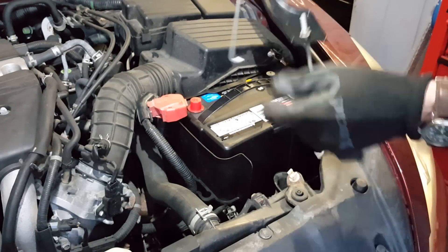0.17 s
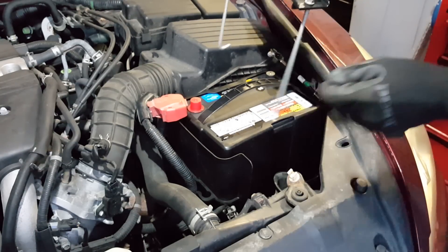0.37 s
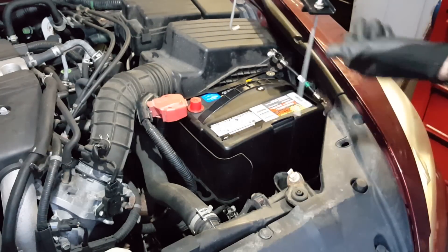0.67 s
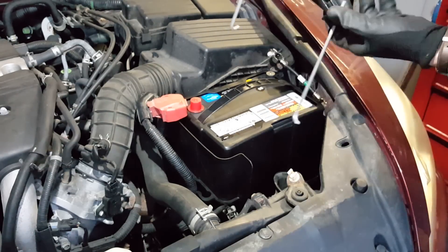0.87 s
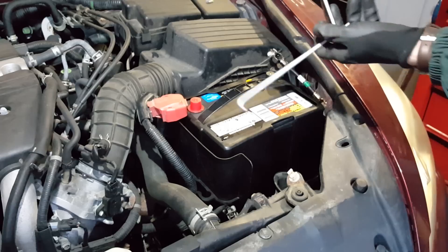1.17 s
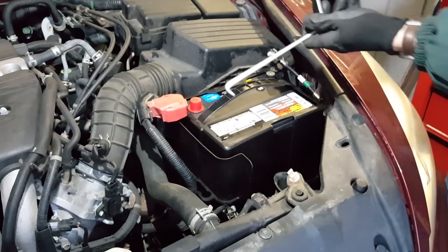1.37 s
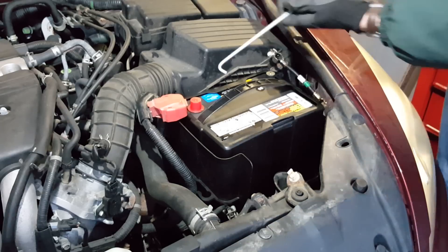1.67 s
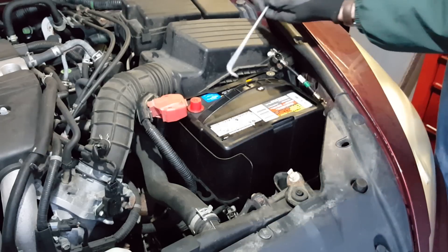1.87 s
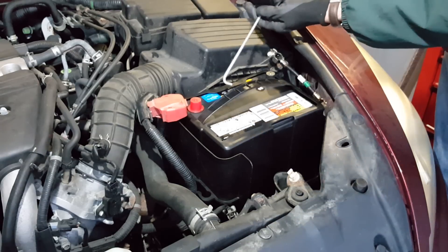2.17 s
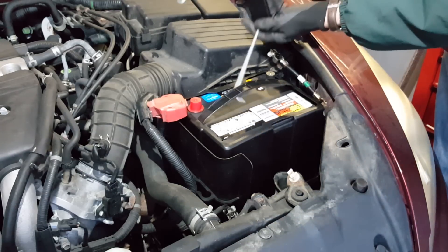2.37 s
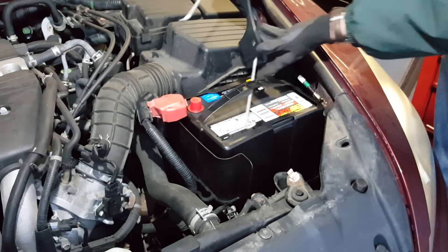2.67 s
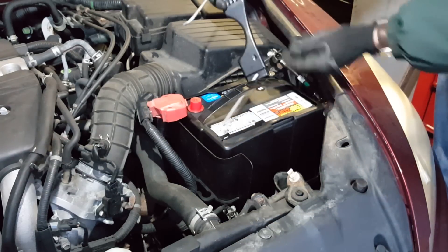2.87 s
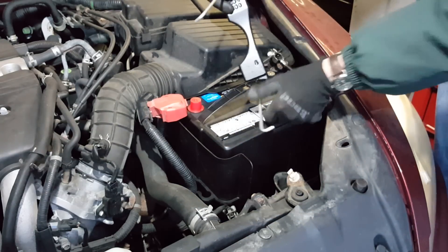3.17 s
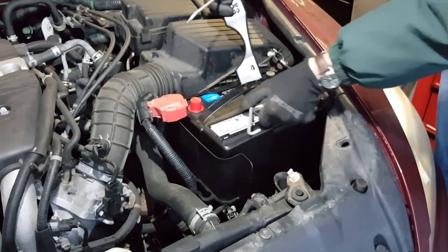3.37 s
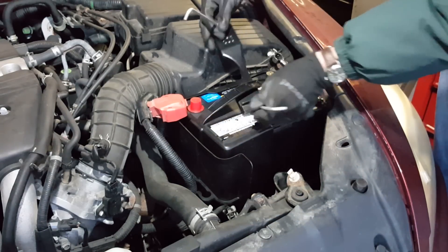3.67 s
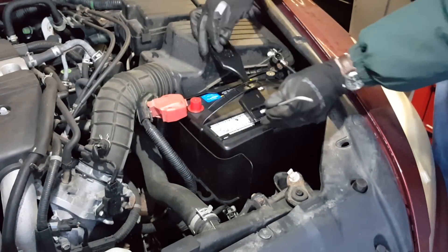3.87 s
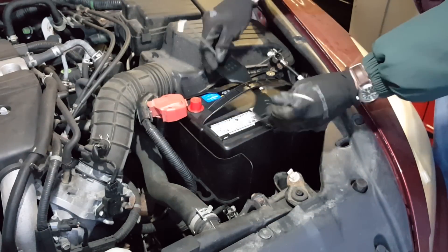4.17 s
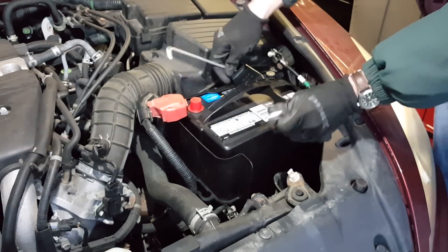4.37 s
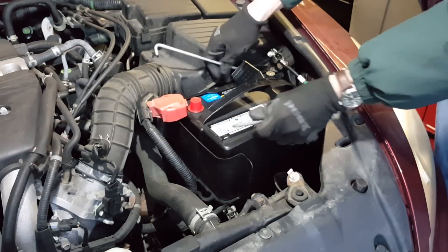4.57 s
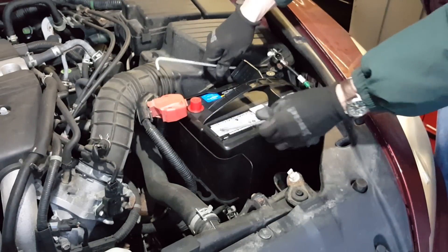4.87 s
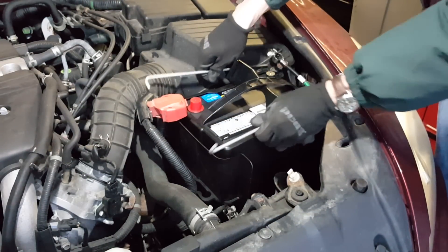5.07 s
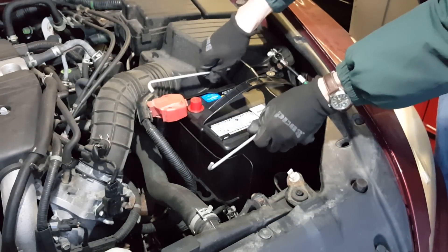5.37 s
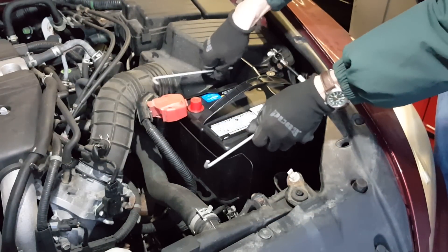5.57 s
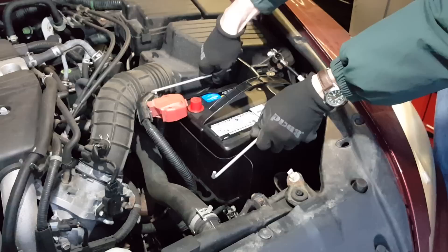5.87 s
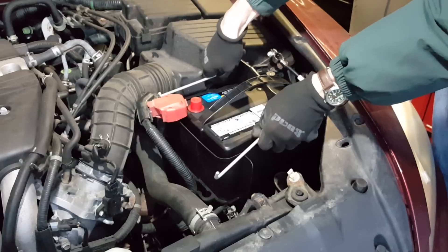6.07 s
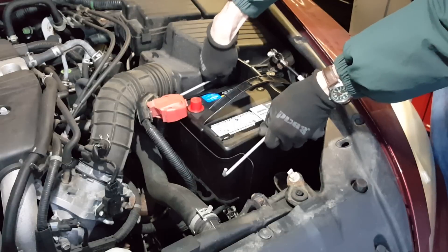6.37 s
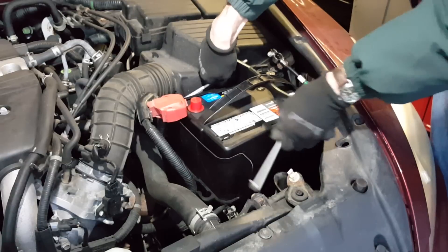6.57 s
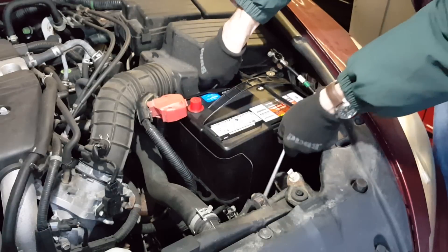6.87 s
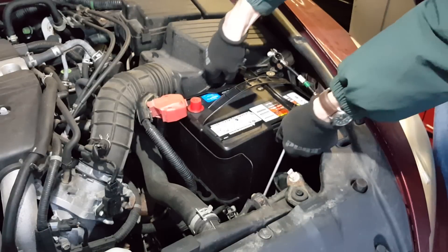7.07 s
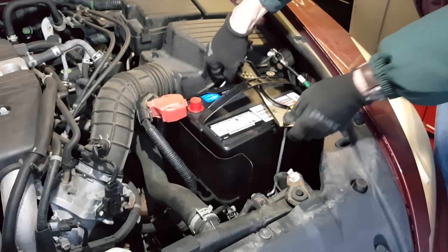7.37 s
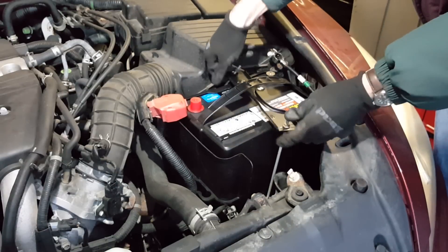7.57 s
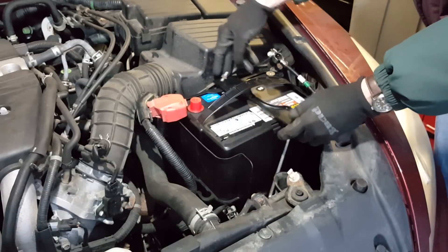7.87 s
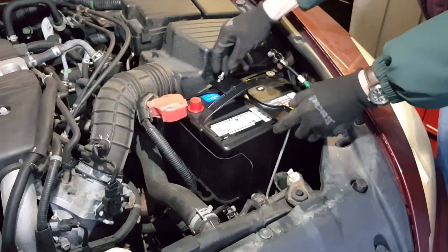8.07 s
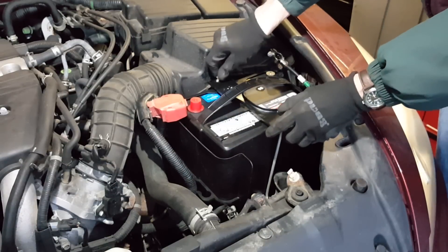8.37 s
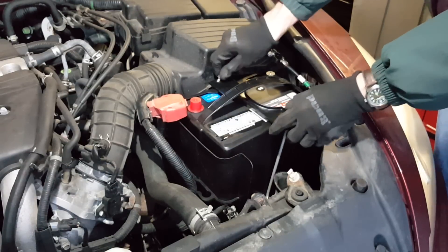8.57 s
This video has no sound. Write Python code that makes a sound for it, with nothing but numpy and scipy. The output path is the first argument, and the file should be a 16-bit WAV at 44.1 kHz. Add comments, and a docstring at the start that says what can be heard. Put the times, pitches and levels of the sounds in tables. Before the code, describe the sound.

Steel rods clink, knock and scrape against a plastic car battery case as gloves rustle over a quiet workshop hum.

```python
"""In a quiet workshop, a steel hold-down bar and two hooked rods are lowered into a car battery's tray.
The steel knocks on the plastic case and panels, rings when it swings free, and scrapes as the rod
threads slide along plastic. Gloves and a sleeve rustle, and rubber squeaks as it slips on a rod.
Behind it all are a steady rush of air and two motors whose hums slowly swell and fade together."""
import sys
import numpy as np
from scipy import signal
from scipy.fft import rfft, irfft, next_fast_len
from scipy.io import wavfile

SR = 44100
rng = np.random.default_rng(int(sys.argv[2]) if len(sys.argv) > 2 else 0)


def transcribe(u):
    """Save the signal u as a 16-bit wav file named by the first command-line argument.

    u: samples, shape (n,) or (channels, n), limited to [-1, 1]; the rate is SR.
    q: integer samples, one column per channel.
    """
    v = np.clip(np.atleast_2d(u).T, -1, 1)
    q = np.round(v * 32767).astype(np.int16)
    wavfile.write(sys.argv[1], SR, q)


N = 385431
SCENE_TIME = np.arange(N) / SR
BLOW_TIME = np.arange(int(.35 * SR)) / SR
ATTACK = SR // 50  # a blow's level is set over its first 20 ms


def undb(db):
    """Turn decibels into a number to multiply by."""
    return 10 ** (np.asarray(db) / 20)


def fade(fade_s):
    """The dying away of one blow: down 60 dB after fade_s."""
    return np.exp(-np.log(1000) * BLOW_TIME / fade_s)


def level(x, db, size=None):
    """Set the average (rms) level, taken over the first size samples or the whole sound."""
    return x * undb(db) / np.sqrt(np.mean(x[..., :size] ** 2) + 1e-20)


def colour(x, spectrum):
    """Shape the tone with (pitch_hz, level_db) points."""
    size = 2 * next_fast_len(x.shape[-1] // 2 + 2048)
    hz, db = np.transpose(spectrum)
    log_hz = np.log(np.fft.rfftfreq(size, 1 / SR) + 1)
    log_gain = np.log(undb(np.interp(log_hz, np.log(hz), db)))
    # fold the filter forward in time, so nothing sounds before its cause
    cepstrum = irfft(log_gain)
    cepstrum[1:size // 2] *= 2
    cepstrum[size // 2 + 1:] = 0
    return irfft(rfft(x, size) * np.exp(rfft(cepstrum)))[..., :x.shape[-1]]


def stereo_noise(size, width):
    """Noise that is the same in both ears at width 0 and unrelated at width 1."""
    mid, side = rng.standard_normal((2, size))
    return np.array([mid + width * side, mid - width * side]) / np.hypot(1, width)


def wander(turns_per_s):
    """A smooth random drift, mostly between -1 and 1."""
    points = rng.standard_normal(4096)
    return np.interp(SCENE_TIME * turns_per_s, np.arange(len(points)), points)


def panned(x, left_db):
    """Make the left ear louder than the right by left_db."""
    return x * undb(np.array([[left_db], [-left_db]]) / 2)


def add(out, start_s, x):
    """Mix a sound in at start_s."""
    i = max(int(start_s * SR), 0)
    out[:, i:i + x.shape[1]] += x[:, :N - i]


def ring(tones, scatter_db, spread_rad, detune):
    """A struck part's fading tones; their strength, pitch and stereo spread vary from blow to blow."""
    out = 0
    for hz, db, fade_s in tones:
        strength, shift, lead, sign = rng.standard_normal(4)
        ear_phase = spread_rad * np.sign(lead) * np.array([[1], [-1]])
        wave = np.sin(2 * np.pi * hz * (1 + detune * shift) * BLOW_TIME + ear_phase)
        out = out + np.sign(sign) * undb(db + scatter_db * strength) * fade(fade_s) * wave
    return out


# Tone of the workshop air: pitch_hz, level_db
AIR_SPECTRUM = [(25, -20), (41, -10.5), (64, -18), (84, -5.5), (166, -9), (240, -12), (330, -17),
                (450, -16), (600, -18), (1070, -26), (1610, -26.5), (3080, -31.5), (5500, -35.5),
                (8000, -31.5), (9500, -42), (16000, -40)]
def workshop_air(level_db=-51.5):
    """Steady air noise whose low notes are alike in both ears."""
    bass = colour(stereo_noise(N, width=0.23), [(300, 3), (1500, -15)])
    treble = colour(stereo_noise(N, width=1), [(150, -33), (800, 1.5)])
    return level(colour(bass + treble, AIR_SPECTRUM), level_db)


# The hum of each motor: pitch_hz, level_db
MOTOR_HUMS = [(59.05, -54.5), (56.8, -59)]
def motor_hum():
    """Two motors at nearly the same speed drift in and out of step, so their hum swells and fades."""
    fast, slow = (level(np.sin(2 * np.pi * hz * SCENE_TIME), db) for hz, db in MOTOR_HUMS)
    return fast - slow


# A glove or sleeve brushes past: loudest_s, length_s, level_db
SWISHES = [(0.224, 0.34, -51.5), (0.716, 0.14, -51), (.832, 0.055, -48), (1.42, 0.052, -51.5),
           (1.812, 0.24, -53.5), (2.806, 0.21, -51), (3.436, 0.075, -52.5), (3.785, 0.37, -50.5),
           (4.88, .075, -56), (6.29, 0.28, -57), (8.67, 0.16, -50.5)]
# Tone of rubbing cloth: pitch_hz, level_db
CLOTH_SPECTRUM = [(120, -30), (350, 2), (800, 0), (1400, -3), (4000, -7), (6000, -10), (8000, -4.5),
                  (9500, -17.5), (16000, -16.5)]
def cloth_rustle(fidget_db=-66):
    """Grainy swishes of cloth rise above the faint rustle of arms that never rest."""
    swishes = sum(undb(db) * np.exp(-2 * ((SCENE_TIME - loudest_s) / length_s) ** 2)
                  for loudest_s, length_s, db in SWISHES)
    fidget = undb(fidget_db + 6 * wander(turns_per_s=4.9))
    grain = stereo_noise(N, width=0.99) * undb(2.5 * wander(150))
    return (swishes + fidget) * level(colour(grain, CLOTH_SPECTRUM), 0)


# What the plastic leaves of a blow's high notes: pitch_hz, level_db
DAMPED_TREBLE = [(4500, -2), (8000, -2), (12000, -6)]
def burst(spectrum, fade_s, width, snap, rise_s):
    """Many short tones blur into noise: a first snap, then a duller scatter from the engine bay."""
    noise = stereo_noise(len(BLOW_TIME), width) * (1 - np.exp(-BLOW_TIME / rise_s))
    blow = colour(noise * fade(fade_s), DAMPED_TREBLE) + snap * noise * fade(0.01)
    return level(colour(blow, spectrum), 0, ATTACK)


# The tones steel makes as it bends back and forth: pitch_hz, level_db, fade_s
STEEL_TONES = [(1340, -8, .3), (2600, -7, .2), (2910, -4, .2), (3190, -6, .18), (3780, -8, .2),
               (4107, -5, .22), (4340, -6, .2), (4980, -7, .14), (5860, 0, .16), (7072, -1, .16),
               (7948, -1, .17), (9690, -3, .13), (10462, -3, .14), (12520, -10, .12), (12700, -5, .14),
               (13625, -1, .17)]
# Tone of steel chattering on steel: pitch_hz, level_db
CHATTER_SPECTRUM = [(600, -29), (1400, 2), (4000, 5), (5200, -3), (6200, 6), (8200, 11), (9100, -3),
                    (10400, -34), (11500, -5), (12800, 16), (14000, -3), (16000, -47)]
# A rod or the bar rings freely: start_s, ring_db, favoured_hz, chatter_db
CLINKS = [(.1, -47, 7950, -54), (.122, -24.5, 7650, -34), (.171, -34, 6350, -36), (1.154, -52, 12400, -56),
          (2.069, -58, 8100, -46), (2.67, -58, 13600, -64), (3.588, -46, 3750, -62),
          (3.916, -50, 4150, -64), (6.046, -42, 12200, -52), (6.705, -43, 10000, -49),
          (6.817, -47, 12200, -55), (6.969, -49, 8000, -44), (7.002, -34.5, 13700, -54),
          (7.019, -36, 2910, -50), (7.169, -49, 12200, -58), (7.918, -32.5, 8000, -50)]
def clinks(boost_db=13, boost_octaves=.12):
    """Steel chatters and rings on; where the blow lands favours the tones near one pitch."""
    out = np.zeros((2, N))
    for start_s, ring_db, favoured_hz, chatter_db in CLINKS:
        tones = [(hz, db + boost_db * np.exp(-(np.log2(hz / favoured_hz) / boost_octaves) ** 2), fade_s)
                 for hz, db, fade_s in STEEL_TONES]
        flutter = undb(1.5 * wander(250)[:len(BLOW_TIME)])  # the loose parts keep touching
        ringing = ring(tones, scatter_db=1.5, spread_rad=0.72, detune=0.0004) * flutter
        chatter = burst(CHATTER_SPECTRUM, fade_s=0.13, width=0.42, snap=.6, rise_s=0.00054)
        add(out, start_s, level(ringing, ring_db, ATTACK) + undb(chatter_db) * chatter)
    return out


# Tones of the battery case, tray and nearby panels: pitch_hz, level_db, fade_s
CASE_TONES = [(339.5, -11, 0.2), (419.6, -5, 0.15), (589.3, 1, 0.22), (670.3, 5.5, 0.12), (765, -4, 0.078),
              (848, 3, 0.11), (950, -1, 0.16), (1064, 5.5, 0.1), (1254, 6, 0.089), (1592, 0.5, 0.13),
              (1800, -10.5, 0.052), (2080, 2, 0.063), (2314, 1, 0.049), (2900, 0, 0.048), (3220, -8, 0.065),
              (3530, -5.5, 0.071), (3995, -12, 0.07)]
# The low, middle and high parts of a knock: pitch_hz, level_db
THUD_SPECTRUM = [(50, -21.5), (130, -7), (280, -7.5), (400, -2.5), (620, 0.5), (800, -4.5), (1300, -47)]
CLACK_SPECTRUM = [(400, -21.5), (620, -20.5), (780, -2.5), (1500, -6), (2100, -8.5), (2700, -18.5),
                  (4500, -45)]
TICK_SPECTRUM = [(1300, -17), (2000, 2.5), (2600, 5.5), (3600, 2), (4900, -3.5), (6500, -7.5), (8200, -5.5),
                 (9400, -19.5), (13000, -18), (16000, -41)]
def knock(hz, db, hardness_db, gloved_fade_s=0.052):
    """One blow: the gloved rod ticks and rings briefly, and the panels swing up to a clack and a thud."""
    thud_db = db + np.clip(-11 * np.log2(hz / 680), -14, 7)  # big, low parts thud the most
    tick_db = db + hardness_db
    thud = undb(thud_db - 4.5) * burst(THUD_SPECTRUM, fade_s=0.092, width=0.072, snap=.05, rise_s=0.0034)
    clack = undb(db - 4) * burst(CLACK_SPECTRUM, fade_s=0.089, width=0.56, snap=0.57, rise_s=0.0009)
    tick = undb(tick_db - 2.5) * burst(TICK_SPECTRUM, fade_s=0.11, width=0.81, snap=2.3, rise_s=0.0004)
    # the struck panel's level follows the part of the blow that lies at its pitch
    panel_db = np.interp(np.log(hz), np.log([590, 780, 2000, 2700, 4500]),
                         [thud_db, db, db, tick_db, tick_db - 10])
    swing_up = 1 - np.exp(-BLOW_TIME / 0.0011)
    panel = ring([(hz, 0, .06)], scatter_db=0, spread_rad=0.31, detune=0) * swing_up
    case = ring(CASE_TONES, scatter_db=4.5, spread_rad=0.43, detune=0.0089) * swing_up
    body = thud + clack + level(panel, panel_db - 4.5, ATTACK) + level(case, db - 8.5, ATTACK)
    gloved_tones = [(tone_hz, tone_db, gloved_fade_s) for tone_hz, tone_db, _ in STEEL_TONES]
    rod = ring(gloved_tones, scatter_db=1.5, spread_rad=0.76, detune=0.0053)
    rod = level(colour(rod, TICK_SPECTRUM), tick_db - 7.5, ATTACK)
    return panned(body, left_db=2.8) + panned(tick + rod, left_db=0.1)


# Steel hits the case, tray or a panel: start_s, pitch_hz, level_db, hardness_db (more is a louder tick)
KNOCKS = [(0.1139, 3950, -38, 3.5), (0.1211, 3130, -37, 7.5), (.171, 1360, -39.5, 10),
          (0.6197, 3800, -53.5, 5), (0.6504, 773, -43, -13), (1.1543, 3190, -57, 2),
          (1.3839, 1695, -49, 1.5), (2.0687, 876, -29, -1), (2.4915, 3010, -47, 4.5),
          (2.5968, 936, -38.5, -7.5), (2.6255, 917, -42, -9), (3.0161, 1097, -42, -16),
          (3.1803, 1645, -38, -10.5), (3.375, 664, -38, -10), (3.5868, 1070, -32.5, -4),
          (3.6705, 1660, -38, 0.5), (3.914, 751, -25, -11.5), (3.925, 156, -43.5, -16),
          (4.067, 854, -34.5, -5), (4.186, 1050, -36, -15), (4.199, 580, -30.5, -13),
          (4.2087, 833, -28.5, -9), (4.2186, 857, -27, -8.5), (4.4015, 800, -43, -5),
          (4.4214, 990, -41, -2), (5.0939, 900, -45.5, -12), (5.1578, 2120, -54.5, 4),
          (5.1925, 1103, -39, -8.5), (5.567, 687, -49, -15), (5.641, 4640, -56, 13.5),
          (5.6806, 1082, -37.5, -8.5), (5.732, 590, -38, -21), (5.764, 4530, -63.5, 18),
          (5.797, 750, -43.5, -22), (5.8383, 583, -40.5, -15), (5.8692, 671, -23.5, -11),
          (5.9362, 2730, -58.5, 14.5), (6.044, 1067, -28.5, -21), (6.0561, 997, -24.5, -22),
          (6.143, 757, -33.5, -14.5), (6.1988, 928, -40, -17), (6.4063, 700, -43.5, -11),
          (6.4458, 1105, -42.5, -9.5), (6.5784, 594, -39.5, -3), (6.6919, 660, -36, -2),
          (6.7103, 574, -31.5, -20), (6.8162, 785, -26, -16.5), (6.9626, 536, -37.5, -1.5),
          (6.968, 810, -34.5, -1), (7.0005, 1328, -21, -14), (7.0175, 1550, -33, 6.5),
          (7.055, 1378, -30, -1), (7.1678, 1310, -27.5, -18), (7.2232, 973, -30.5, -8),
          (7.251, 893, -38, -8.5), (7.3266, 1593, -23.5, -7), (7.368, 1586, -29.5, -11),
          (7.383, 1500, -37.5, 2), (7.4498, 1280, -40, -12), (7.5714, 1449, -22.5, -9),
          (7.574, 352, -40, -12), (7.6427, 590, -35, -11.5), (7.9108, 944, -27, -7),
          (7.9238, 902, -25, -24), (8.0037, 688, -35.5, -3.5), (8.4634, 850, -42.5, -10),
          (8.6205, 966, -39, -3), (8.6834, 934, -36.5, -9)]
def knocks(touch_count=8, aiming_s=(5.05, 7.85)):
    """The clear blows, plus faint random touches while the rods are aimed at the tray."""
    out = np.zeros((2, N))
    for start_s, hz, db, hardness_db in KNOCKS:
        add(out, start_s, knock(hz, db, hardness_db))
    for when, octave in rng.random((touch_count, 2)):
        touch = knock(hz=850 * 2 ** (octave - .5), db=-51, hardness_db=-7)
        add(out, np.interp(when, [0, 1], aiming_s), touch)
    return out


# A glove slips along a rod, one list of points for each slip: time_s, pitch_hz, level_db
GLOVE_SLIPS = [
    [(.67, 230, -53), (.71, 360, -46.5), (.75, 690, -49), (.78, 650, -58), (.81, 400, -57)],
    [(3.6, 990, -50), (3.66, 920, -42.5), (3.72, 810, -41.5), (3.82, 750, -59)],
]
def glove_squeaks():
    """Rubber sticks and slips on the rod, squeaking at an unsteady pitch."""
    out = np.zeros(N)
    for slip in GLOVE_SLIPS:
        time_s, hz, db = np.transpose(slip)
        pitch_hz = np.interp(SCENE_TIME, time_s, hz) * (1 + .17 * wander(500))
        level_db = np.interp(SCENE_TIME, time_s, db, left=-200, right=-200) + 3 * wander(120)
        out += np.sin(2 * np.pi * np.cumsum(pitch_hz) / SR) * undb(level_db)
    return out


# Tone of scraped plastic: pitch_hz, level_db
SCRAPE_SPECTRUM = [(100, -8), (300, -10), (620, 4.5), (1000, -2), (1500, -6), (2500, -10.5), (5000, -24.5),
                   (8200, -17), (9600, -33.5), (16000, -38)]
# A rod slides along plastic: start_s, length_s, halfway_level_db
SCRAPES = [(3.94, 0.04, -40), (5.832, 0.04, -37), (6.039, 0.031, -31.5), (6.541, .13, -37.5),
           (6.669, .054, -33), (7.027, 0.095, -44), (7.176, 0.03, -39.5), (7.425, 0.14, -46.5),
           (7.738, 0.039, -38), (7.865, 0.1, -39.5), (7.975, 0.057, -39.5)]
def scrapes(catches_per_s=1200, swell_db=3.5, rod_db=-24):
    """The rod's threads catch and slip: many tiny blows on the plastic, which also ring the rod faintly."""
    force = np.zeros(N)
    for start_s, length_s, db in SCRAPES:
        progress = (SCENE_TIME - start_s) / length_s
        ramp_db = [db - swell_db / 2, db + swell_db / 2]  # the hand presses harder as it goes
        force += undb(np.interp(progress, [0, 1], ramp_db, left=-np.inf, right=-np.inf))
    caught = rng.random(N) < catches_per_s / SR
    catches = caught * undb(1.5 * rng.standard_normal(N)) * rng.choice([-1, 1], N)
    noise = stereo_noise(len(BLOW_TIME), width=0.6)
    plastic = colour(noise * (fade(0.11) + 3 * fade(0.0016)), SCRAPE_SPECTRUM)
    rod = ring(STEEL_TONES, scatter_db=3, spread_rad=.7, detune=0)
    one_catch = level(plastic, 0) + level(rod, rod_db)
    one_catch /= np.sqrt(np.sum(one_catch ** 2) / 2)
    return signal.fftconvolve([level(catches, 0) * force], one_catch, axes=1)[:, :N]


def wall_echo(x, low_fade_s=0.43, high_fade_s=0.37, echo_db=-18):
    """The workshop walls answer late and dull; the high notes die first."""
    low = colour(stereo_noise(len(BLOW_TIME), width=0.59) * fade(low_fade_s),
                 [(150, 4.5), (700, -1), (2000, -3.5), (5000, -6), (10000, -24)])
    high = colour(stereo_noise(len(BLOW_TIME), width=1) * fade(high_fade_s),
                  [(1000, -4), (3000, -10), (8000, -7.5), (14000, -14)])
    tail = (low + high) * (1 - np.exp(-BLOW_TIME / 0.0039))
    tail /= np.sqrt(np.sum(tail ** 2) / 2)
    return signal.fftconvolve(x, tail, axes=1)[:, :N] * undb(echo_db)


def scene():
    """The steel parts and their echo, the hands that move them, and the workshop behind."""
    parts = knocks() + clinks() + panned(scrapes(), left_db=2.5)
    return parts + wall_echo(parts) + cloth_rustle() + glove_squeaks() + workshop_air() + motor_hum()


def record(dry, top_hz=16300):
    """Cut away the very highest notes."""
    return signal.sosfilt(signal.ellip(8, .2, 70, top_hz, fs=SR, output="sos"), dry)


dry = scene()
out = record(dry)
transcribe(out)
```